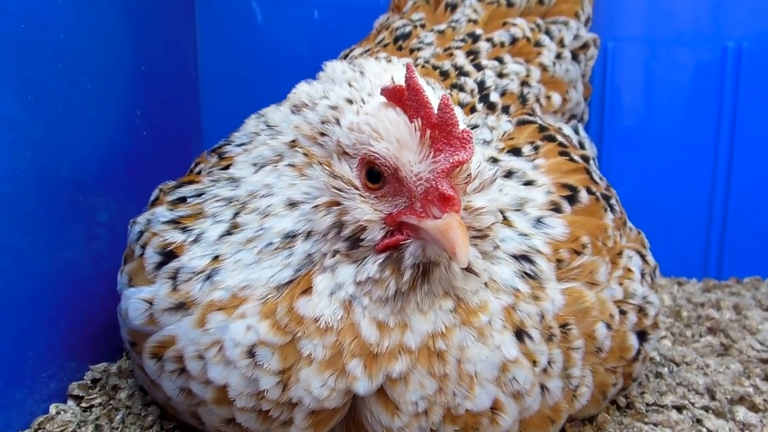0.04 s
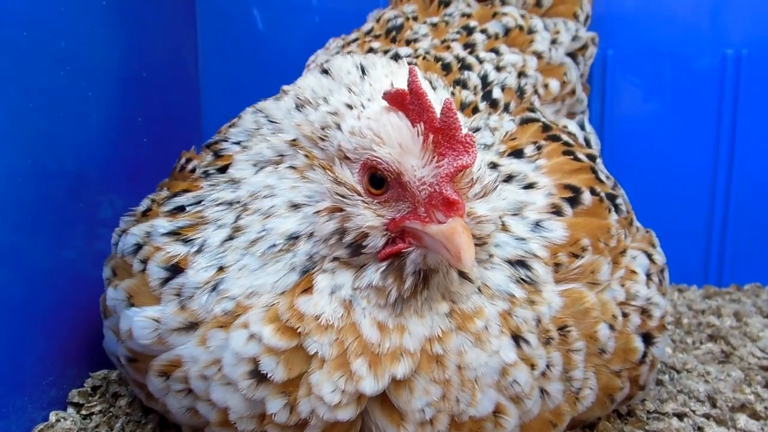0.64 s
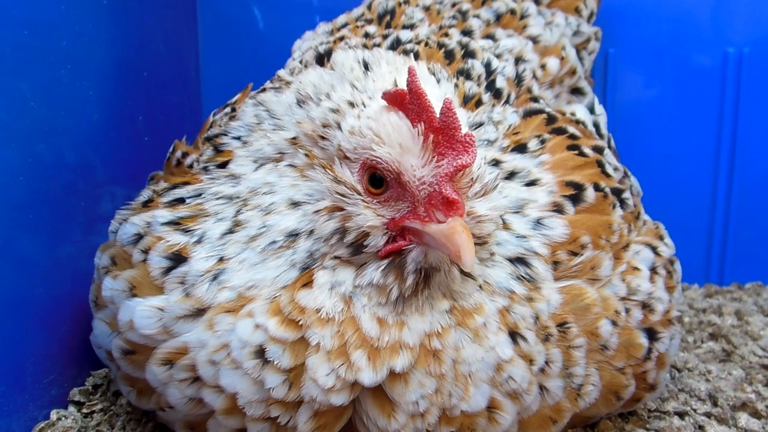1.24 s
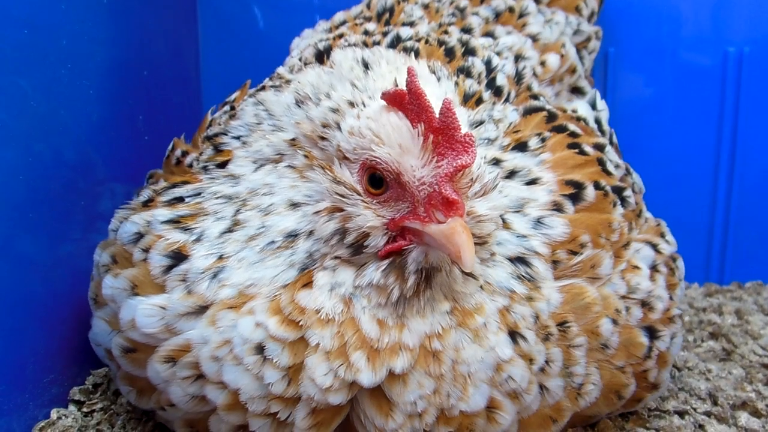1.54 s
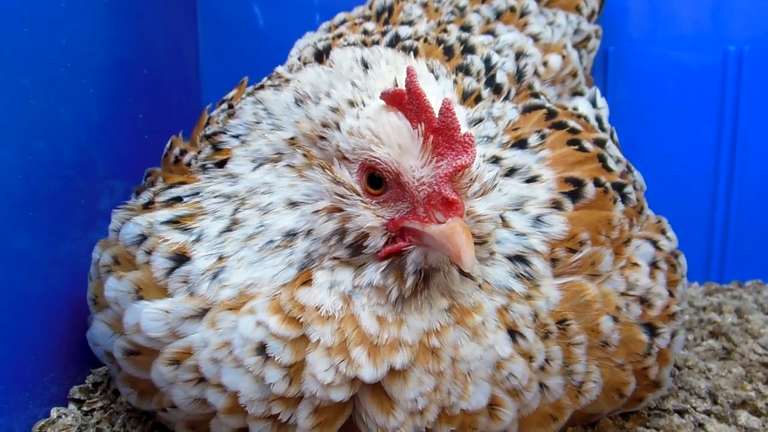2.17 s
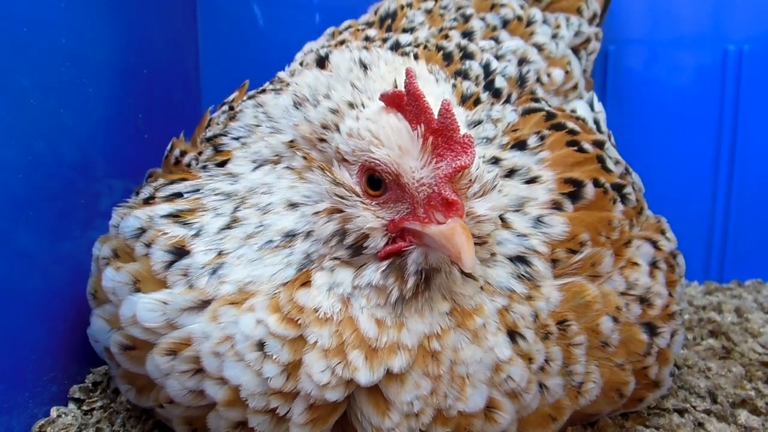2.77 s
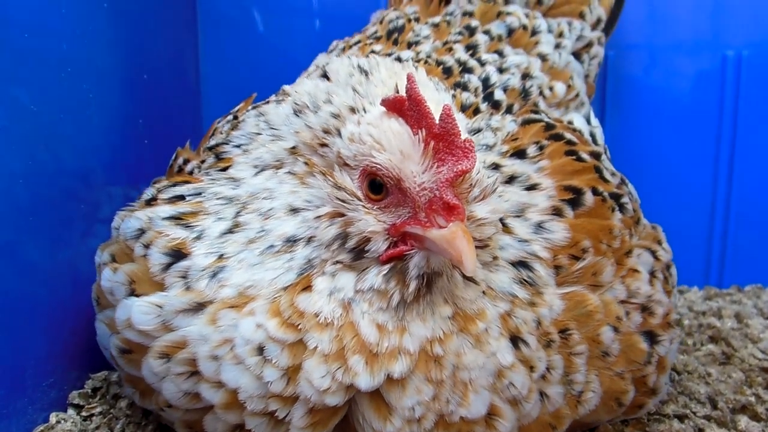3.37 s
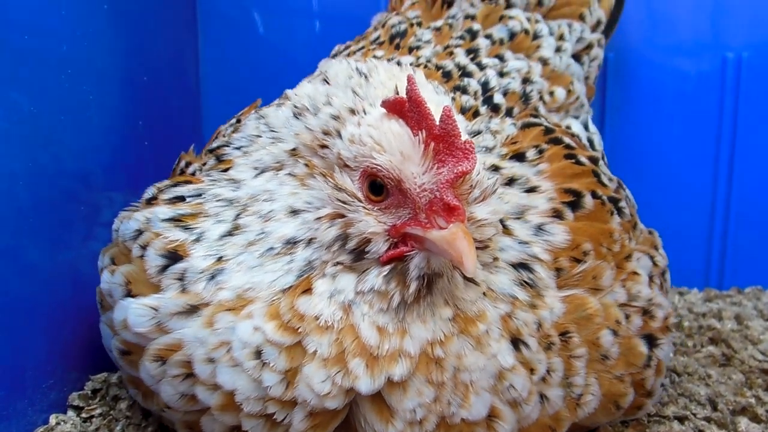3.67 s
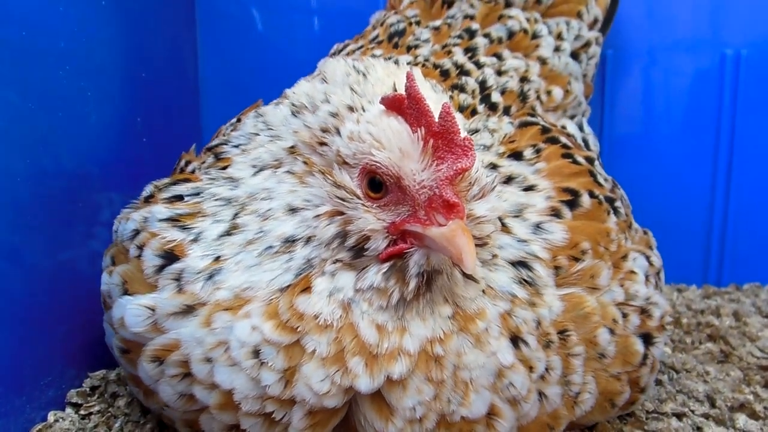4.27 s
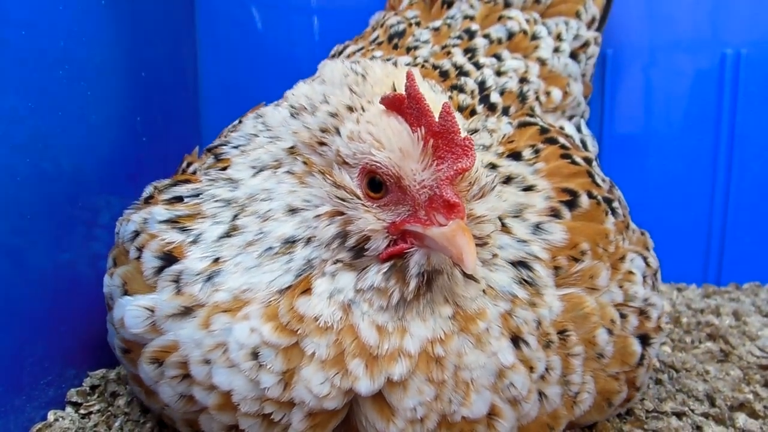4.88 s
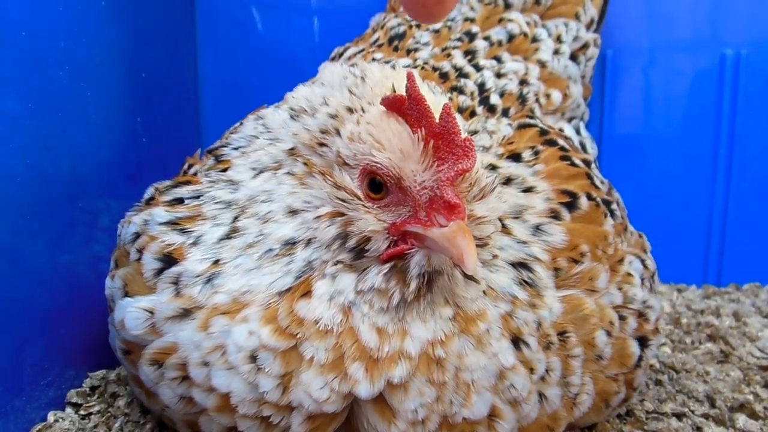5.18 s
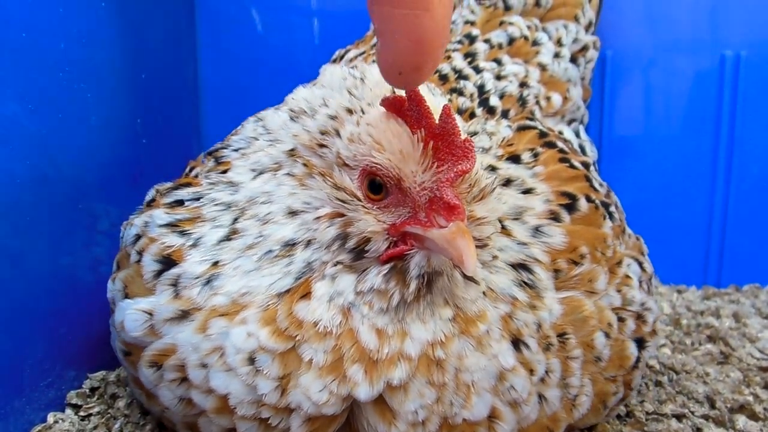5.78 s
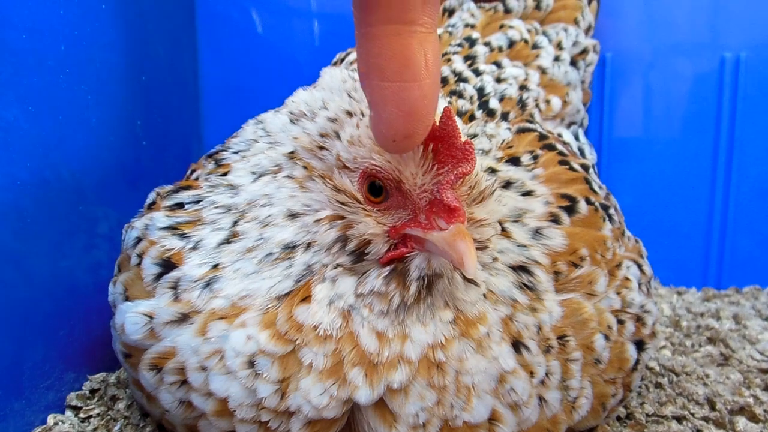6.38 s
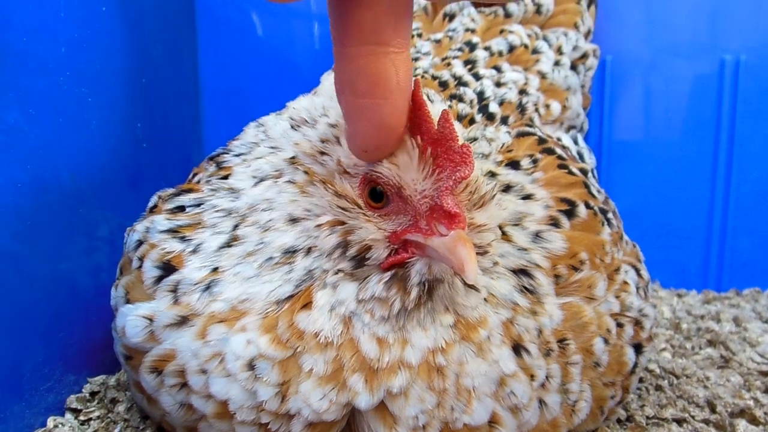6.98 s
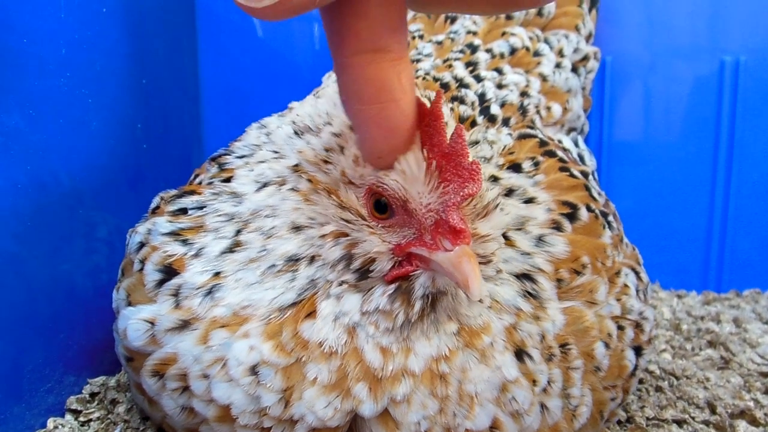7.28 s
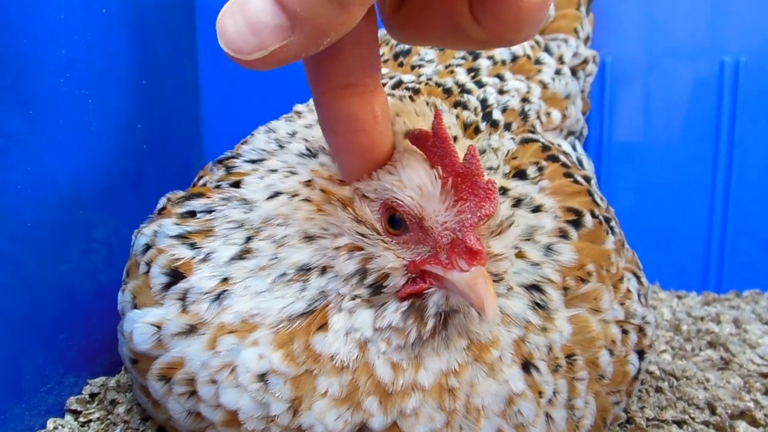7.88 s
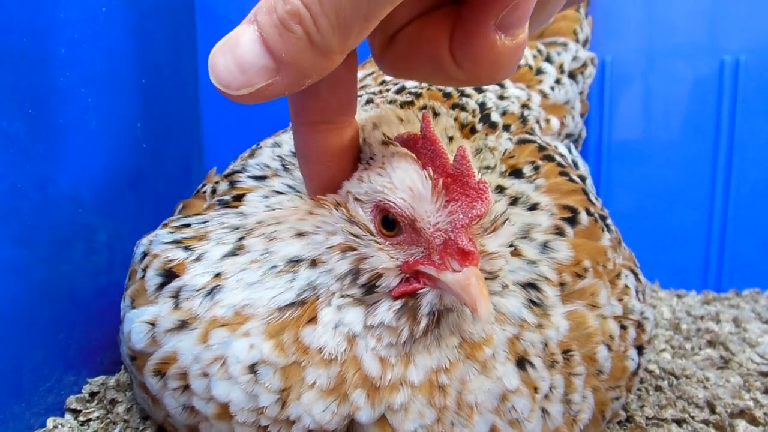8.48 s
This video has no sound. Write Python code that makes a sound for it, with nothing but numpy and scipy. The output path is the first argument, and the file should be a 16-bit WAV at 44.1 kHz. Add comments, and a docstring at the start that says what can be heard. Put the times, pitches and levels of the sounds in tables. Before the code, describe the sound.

A hen growls very close to the microphone in a plastic nest box. Her rapidly fluttering voice rises to a shriek, breaks into short croaks and sinks into a low rasp after about three seconds. The box takes two soft bumps early on, and chicks peep faintly nearby. Afterwards her feathers rustle lightly as she is stroked, while a distant engine slowly grows over a quiet outdoor rumble.

```python
"""Broody hen in a nest box

A hen growls close up in a plastic nest box: one whistling tone that swoops down about 58 times
a second, rises to a shriek, breaks into short croaks and sinks into a rasp. Chicks peep nearby,
feathers rustle as she is stroked, the box takes two soft bumps, and a far engine grows over
a quiet outdoor rumble."""
import sys
import numpy as np
from scipy import signal
from scipy.fft import rfft, irfft
from scipy.io import wavfile
from scipy.ndimage import uniform_filter1d

SR = 44100
rng = np.random.default_rng(int(sys.argv[2]) if len(sys.argv) > 2 else 0)


def digitize_waveform(pressure):
    """Quantize a signal to 16-bit integers and store it at the path in sys.argv[1].

    Rows of a 2-D input are taken as channels; values are limited to [-1, 1].
    """
    field = np.atleast_2d(pressure).T
    bounded = np.clip(field, -1, 1)
    quanta = np.round(bounded * 32767).astype(np.int16)
    wavfile.write(sys.argv[1], SR, quanta)


N = 380583
T = np.arange(N) / SR
FREQS = np.fft.rfftfreq(N, 1 / SR)
TOP_HZ = 14300

# surges and sags of strain in the shriek: centre t/s, length/s, lift/dB
STRAIN_SURGES = [(.86, 0.018, 4), (.888, 0.01593, -6), (.92, 0.021, 3), (.943, 0.02497, -4)]
SURGE_AIR = 2.05  # dB of rasp and hiss for each dB of surge


def undb(db):
    """Decibels to gain."""
    return 10 ** (np.asarray(db) / 20)


def curves(table):
    """Each column of a table, joined by straight lines in time."""
    times, *columns = np.transpose(table)
    return [np.interp(T, times, column) for column in columns]


def swells(table):
    """Bell-shaped lifts in dB."""
    return sum(db * np.exp(-(2 * (T - centre) / length) ** 2) for centre, length, db in table)


def gain_at(hz, points):
    """Gain of an EQ curve (f/Hz, level/dB) at given frequencies."""
    f, db = np.transpose(points)
    return undb(np.interp(np.log(hz + 1e-3), np.log(f), db))


def unit(x):
    """Scale to rms 1."""
    return x / np.sqrt(np.mean(x ** 2))


def noise(colour):
    """Noise of a given colour, rms 1, with no infrasound."""
    return unit(irfft(rfft(rng.standard_normal(N)) * gain_at(FREQS, colour) * (FREQS > 20), N))


def wide_noise(colour):
    """Stereo noise: centred in the bass, wide in the treble."""
    # stereo width: f/Hz, side minus mid/dB
    width = [(30, -26), (70, -22.5), (300, -15), (1000, -9.5), (2500, -3), (6000, 0), (14000, 2)]
    side = irfft(rfft(noise(colour)) * gain_at(FREQS, width), N)
    return noise(colour) + np.array([side, -side])


def walk(rate):
    """Smooth random wander, rms 1."""
    hold = max(int(SR / rate), 1)
    return unit(uniform_filter1d(np.repeat(rng.standard_normal(N // hold + 1), hold)[:N], hold))


def echoes(x, t60, size=16384):
    """A short diffuse tail of unit energy, different on each side."""
    tails = rng.standard_normal((2, size)) * np.exp(-np.log(1000) * T[:size] / t60) * (T[:size] > .003)
    tails /= np.sqrt(np.sum(tails ** 2, axis=1, keepdims=True))
    return signal.fftconvolve(x[None], tails, axes=1)[:, :N]


def outdoor_bed(air_db=-42.5):
    """Outdoor rumble and hiss, with a faint electronic whine."""
    # colour of the open air: f/Hz, level/dB
    air_colour = [(22, -2), (45, -1), (76, 2.5), (150, -13), (250, -14), (400, -18), (900, -22.5),
                  (1300, -25), (2500, -31.5), (5000, -35.5), (14000, -38.5)]
    # whine tones: f/Hz, level/dB
    whine_tones = [(12328, -72), (13194, -76)]
    whine = sum(np.sqrt(2) * undb(db) * np.sin(2 * np.pi * hz * T) for hz, db in whine_tones)
    return wide_noise(air_colour) * undb(air_db + .4 * walk(3.498)) + whine


def far_engine(firing_hz=71.4):
    """An engine draws near: a wavering firing hum, a drone above it and the wash of the road."""
    # fader for all three layers: t/s, level/dB
    approach = [(0, -78), (3, -57.5), (4.5, -52), (7.1, -46), (7.85, -43), (8.63, -44)]
    # swells of hum and drone: centre t/s, length/s, lift/dB
    hum_swells = [(5.55, 0.85, 10.5), (6.9, .7, 6), (8.33, 0.91, 13.5)]
    drone_swells = [(7.52, 0.65, 6.4)]
    # colours of drone and road: f/Hz, level/dB
    drone_colour = [(60, -52), (125, -6.5), (175, -6.5), (235, 9.5), (280, 4), (360, -11.5), (700, -69),
                    (1080, -24), (1220, -7), (1380, -70), (3000, -72)]
    road_colour = [(100, -1.5), (380, -10.5), (520, -1), (750, -9), (1000, -4), (1120, -13.5),
                   (1220, -14.5), (1400, -11.5), (2000, -20.5), (4000, -31.5), (14000, -61)]
    near_db, = curves(approach)
    phase = 2 * np.pi * np.cumsum(firing_hz * (1 + .055 * walk(16))) / SR
    hum = np.sqrt(2) * np.sin(phase) * undb(-3.5 + swells(hum_swells) + .25 * walk(6.7))
    drone = wide_noise(drone_colour) * undb(.5 + swells(drone_swells))
    road = wide_noise(road_colour) * undb(.5 + 1.4 * walk(5.9))
    return (hum + drone + road) * undb(near_db)


def touches(cues, colour, grain_db):
    """Soft swells of grainy contact noise."""
    envelope = sum(undb(db) * np.exp(-(2 * (T - centre) / length) ** 2) for centre, length, db in cues)
    return wide_noise(colour) * envelope * unit(undb(grain_db * walk(600)))


def box_bumps():
    """Soft, low bumps on the box."""
    # bumps: centre t/s, length/s, level/dB
    bumps = [(.705, 0.037, -30.5), (.78, 0.23, -41.5)]
    # dull thud of the box: f/Hz, level/dB
    thud_colour = [(25, 6), (60, -1.5), (110, -12), (180, -3.5), (280, -19), (600, -26), (2000, -75)]
    return touches(bumps, thud_colour, grain_db=1)


def feathers():
    """Feathers rustle as the hen is stroked."""
    # strokes: centre t/s, length/s, level/dB
    strokes = [(3.29, .05, -58), (3.64, .06, -55), (5.78, .22, -56), (7.13, 0.14, -60), (7.33, 0.058, -57),
               (7.45, 0.11, -58), (7.70, 0.046, -53), (7.9, 0.044, -58), (8.17, 0.29, -60),
               (8.53, 0.37, -55)]
    # bright rustle: f/Hz, level/dB
    rustle_colour = [(1000, -10), (3000, 0.5), (7000, -2), (11000, 0), (14000, -4)]
    return touches(strokes, rustle_colour, grain_db=2.5)


def chicks(quaver=.0181, wet=.7):
    """Thin, quavering whistles that scoop up and fall, heard through the coop's reflections."""
    # peeps: start t/s, length/s, top f/Hz, end f/Hz, relative level/dB
    peeps = [(1.216, 0.048, 3965, 3100, -34.5), (1.497, 0.12, 5830, 3000, -43),
             (1.494, 0.099, 4730, 3000, -38.5), (2.77, 0.15, 4418, 3200, -40),
             (2.977, 0.16, 6330, 3500, -45.5), (3.021, 0.1, 5380, 3100, -42.5),
             (4.005, .125, 4750, 2900, -49), (8.272, .14, 6570, 3800, -48),
             (8.33, 0.086, 5200, 3700, -45.5), (8.47, 0.13, 6420, 3400, -39.5),
             (8.494, 0.12, 5700, 3200, -51)]
    whistles = np.zeros(N)
    waver = 1 + quaver * walk(250)
    for start, length, top_hz, end_hz, db in peeps:
        on = (T > start) & (T < start + length)
        progress = (T[on] - start) / length
        fall_hz = top_hz - (top_hz - end_hz) * ((progress - .17) / .8) ** 2
        scoop = 1 - .09024 * np.exp(-progress / .0737)
        phase = 2 * np.pi * np.cumsum(fall_hz * waver[on] * scoop) / SR
        envelope = np.sqrt(2 * np.minimum(2 * np.sin(np.pi * progress), 1))
        whistles[on] += undb(db) * envelope * np.sin(phase)
    whistles *= 1 + .55 * np.tanh(walk(130))  # the level flickers
    return .56 * ((1 - wet) * whistles + wet * echoes(whistles, t60=.12))


def nest_box(x, ring_hz=1550, ring_width_hz=25, ring_db=-12, wet_db=-31):
    """Close walls colour each side; standing waves turn the phase on the right; the box rings briefly."""
    # standing waves between the walls: f/Hz, width/Hz
    standing_waves = [(1470, 164), (5150, 820)]
    # the walls favour one side: f/Hz, left minus right/dB
    balance = [(1000, -0.5), (1380, 0), (1510, 6.5), (1620, -3), (1760, -4), (2000, -7), (2750, -3),
               (3150, -9.5), (3700, -1), (4500, 3.5), (4750, -11), (5100, 17), (7000, -3.5), (11000, -4.5)]
    right = 1
    for hz, width in standing_waves:
        pole = hz ** 2 - FREQS ** 2 + 1j * FREQS * width
        right = right * (1 - (1 - pole.conj() / pole) * np.minimum(FREQS / hz, 1) ** 4)
    ring = 1j * FREQS * ring_width_hz / (ring_hz ** 2 - FREQS ** 2 + 1j * FREQS * ring_width_hz)
    left = gain_at(FREQS, balance)
    pan = np.array([left, right]) * np.sqrt(2 / (1 + left ** 2))
    return irfft(rfft(x) * (pan + undb(ring_db) * ring), N) + undb(wet_db) * echoes(x, t60=.31)


def beak_hiss(centre_s=.94, length_s=1):
    """Air hisses through the beak at the height of the shriek, flickering and flaring with the surges."""
    # colour of the hiss: f/Hz, level/dB
    hiss_colour = [(2000, -22), (4500, 3), (6000, -6), (7200, -1), (9000, -8), (10100, 3), (11500, -5),
                   (14000, -10)]
    db = -50 + SURGE_AIR * swells(STRAIN_SURGES) + 2 * walk(110)
    return noise(hiss_colour) * undb(db) * np.exp(-(2 * (T - centre_s) / length_s) ** 2)


def rasp(crest_hz, turns, arch, phase, dull_below_hz=1120, treble_cut_db=-9.5):
    """Air that rasps once a cycle, strongest as the pitch snaps back up and duller on low notes."""
    # colour of the rasp: f/Hz, level/dB
    rasp_colour = [(150, -22), (450, -62), (850, 7), (1700, 11), (2100, 0), (2500, -6), (3050, -0.5),
                   (3900, -11), (4700, -0.5), (5800, -19.5), (10000, -16.5), (14000, -25)]
    air = noise(rasp_colour)
    treble = signal.sosfiltfilt(signal.butter(2, 4000, "high", fs=SR, output="sos"), air)
    air = air + treble * (undb(treble_cut_db / (1 + (crest_hz / dull_below_hz) ** 4)) - 1)
    snap_db = 1.6 * np.sin(2 * np.pi * turns) + 3.5 * arch + 4 * np.tanh(walk(150))
    return air * undb(snap_db) * (1 + .16 * np.cos(phase))


def croaks(flutter_hz=58.1, attack_s=.005, release_s=.008, slide_s=.0135, crack_s=.0047, crack_db=.5):
    """Each croak opens with a downward slide and, if it lasts, cracks at the bottom and flutters on."""
    # croaks: start t/s, end t/s, relative level/dB, lift of the opening/dB
    cues = [(0.234, 0.261, -1, -21), (0.306, 0.314, -5.5, 6), (0.318, 0.328, 7.5, -3.5),
            (0.337, 0.342, -2, 12), (.351, 1.224, 1, -5), (1.226, 1.346, -2.5, -4),
            (1.347, 1.396, -3, -3.5), (1.422, 1.451, -0.5, -0.5), (1.479, 1.505, 1.5, -6.5),
            (1.534, 1.573, -0.5, -7.5), (1.599, 1.629, 0, -3), (1.652, 1.693, -0.5, -8),
            (1.704, 1.715, -3, 1), (1.72, 1.751, -3, 3.5), (1.749, 1.761, -1, -8), (1.77, 1.8, 3, -2),
            (1.826, 1.866, 0.5, 2), (1.876, 1.922, 1, -5.5), (1.929, 2.678, 0, 0.5),
            (2.689, 2.732, 2.5, -4), (2.747, 2.854, 2.5, -4), (2.858, 2.87, -6.5, 2), (2.879, 2.912, 0, -2)]
    rate = flutter_hz * (1 + .14 * walk(45))
    gain, turns, opening, crack = np.zeros((4, N))  # turns counts swoops, whole at each dip
    for start, end, db, opening_db in cues:
        on = (T > start - attack_s / 2) & (T < end + release_s / 2)
        age = T[on] - start
        after = age - slide_s
        # the slide runs from a crest to the first dip, where the flutter takes over
        first_dip = np.ceil(turns.max()) + 1
        slide = .5 * np.minimum(after / slide_s, 0)
        turns[on] = first_dip + slide + np.cumsum(rate[on] * (after > 0)) / SR
        opening[on] = np.clip(-after / attack_s, 0, 1)
        crack[on] = np.exp(-((after - crack_s / 2) / crack_s) ** 2)
        gate = np.clip(np.minimum(age / attack_s, (end - T[on]) / release_s) + .5, 0, 1)
        gain[on] = gate * undb(db + opening_db * opening[on] + crack_db * crack[on])
    return gain, turns, opening, crack


def swoops(crest_hz, tight, hoarse_db, turns, opening, crack):
    """Pitch and level flutter: a tight syrinx lingers on top and dips sharply; a slack one swings evenly."""
    def morph(slack, taut):
        return slack + (taut - slack) * tight

    # depth as a share of the pitch: low notes swing less, a hoarse shriek dips further
    depth = morph(.365, .17) + .07 * np.log2(crest_hz / 1500)
    depth += .07 * tight * np.minimum(undb(hoarse_db + 26), 1)
    # 0 in a dip, 1 on a crest: each swoop snaps up quickly and slides down more slowly
    arch = np.abs(np.sin(np.pi * (turns % 1) ** .85)) ** morph(1.35, .9)
    # no two swoops are alike: the higher ones are also louder
    chance = np.clip(rng.standard_normal((N // 100, 2)), -1.4, 1.4)
    dip_lift = chance[np.round(turns).astype(int), 0] * (1 - crack)
    crest_lift = chance[turns.astype(int), 1]
    top_hz = crest_hz * (1 + morph(.04005, .01187) * crest_lift) * (1 - .06 * opening)
    trough_hz = crest_hz * (1 - depth - .08 * crack + .05 * dip_lift)
    lurch = morph(.0364, 0) * np.tanh(walk(28.05))
    jitter = morph(.01967, .0013)
    hz = (top_hz * arch + trough_hz * (1 - arch)) * (1 + jitter * walk(1100) + lurch)
    top_db = morph(1.3, .6) * crest_lift
    trough_db = morph(1.5, -4) + 2 * tight * dip_lift
    shimmer_db = 55 * jitter * np.tanh(walk(350))
    return hz, top_db * arch + trough_db * (1 - arch) + shimmer_db, arch


def throat_tone(hz, phase, crest_hz, tight, arch, opening):
    """The whistle of the syrinx and its overtones, coloured by the throat."""
    # throat EQ for the fundamental and for the overtones: f/Hz, level/dB
    fundamental_eq = [(500, -4), (660, -3), (880, 2.5), (1100, -0.5), (1400, -2), (1750, -1)]
    overtone_eq = [(1300, -3.5), (1700, -4.5), (2100, -27.5), (2500, -27), (3050, -18), (3500, -26.5),
                   (3950, -31.5), (4700, -20.5), (5200, -29), (5800, -73), (7100, -44.5), (9000, -53),
                   (10300, -45.5), (14000, -59)]
    fundamental = gain_at(hz, fundamental_eq) * np.sin(phase)
    # the higher the note, the sharper its pulses and the stronger the top overtones
    edge = 4.8 * (hz / 1500 - 1)
    overtones = sum((k / 2) ** edge * gain_at(k * hz, overtone_eq) * (k * hz < TOP_HZ) * np.sin(k * phase)
                    for k in range(2, 10))
    overtone_db = 3.5 + 8 * np.log2(crest_hz / 1500) + 2.7 * walk(120)
    overtone_db -= 8 * (1 - arch) + 10 * opening  # dips and opening slide lack pressure and are duller
    slack_octave = undb(-23.5) * (1 - tight) * (1 - opening) * np.cos(2 * phase)
    return np.sqrt(2) * (fundamental + slack_octave + undb(overtone_db) * overtones)


def hen(shriek_hz=1617, blend_hz=44.96):
    """A fluttering, hoarse growl that tightens into a shriek as its pitch climbs."""
    # tension and effort of the voice: t/s, crest f/Hz, level/dB
    growl = [(0.25, 1238, -15.5), (0.33, 1310, -27), (0.425, 1720, -20), (0.65, 1740, -21),
             (0.86, 1827, -18.5), (1.21, 1650, -20), (1.36, 1466, -18.5), (1.43, 1197, -18.5),
             (1.49, 1001, -18.5), (1.56, 975, -15), (1.62, 1420, -17.5), (1.88, 1489, -20),
             (2.06, 1582, -18), (2.36, 1576, -15.5), (2.5, 1465, -15.5), (2.585, 1201, -16.5),
             (2.66, 1097, -15.5), (2.77, 859.7, -20), (2.9, 838, -16.5)]
    # hoarseness, the shriek starting clean and turning rough: t/s, relative level/dB
    hoarseness = [(.25, -18.5), (.32, -17), (.375, -12), (.42, -58.5), (.72, -52.5), (.83, -28),
                  (1.2, -26.5), (1.5, -21.5), (2.1, -22.5), (2.9, -15.5)]
    crest_hz, effort_db = curves(growl)
    hoarse_db, = curves(hoarseness)
    surge_db = swells(STRAIN_SURGES)
    tight = .5 + .5 * np.tanh((crest_hz - shriek_hz) / blend_hz)  # 0 slack growl, 1 shriek
    gain, turns, opening, crack = croaks()
    hz, swoop_db, arch = swoops(crest_hz, tight, hoarse_db, turns, opening, crack)
    hz = hz * (1 + .00823 * surge_db)  # strain bends the pitch
    phase = 2 * np.pi * np.cumsum(hz) / SR
    tone = throat_tone(hz, phase, crest_hz, tight, arch, opening)
    rasp_db = hoarse_db + SURGE_AIR * surge_db + 3 * crack - 7.3 * opening
    air = rasp(crest_hz, turns, arch, phase) * undb(rasp_db)
    # on rough crests every other cycle differs, adding tones at 1/2 and 3/2 of the pitch
    grit = (np.sin(phase / 2) + .85 * np.sin(3 * phase / 2)) * walk(120)
    grit *= arch ** 2 * (1 - opening) * undb(hoarse_db + np.interp(tight, (0, 1), (-2, 4)))
    return (tone + air + grit) * undb(effort_db + surge_db + swoop_db) * gain


def scene():
    """The hen in her box and everything around it."""
    contact = feathers() + box_bumps()
    return nest_box(hen() + beak_hiss()) + chicks() + contact + far_engine() + outdoor_bed()


def record(dry):
    """A steep low-pass cuts the top."""
    return signal.sosfilt(signal.ellip(10, .2, 70, TOP_HZ, fs=SR, output="sos"), dry)


dry = scene()
out = record(dry)
digitize_waveform(out)
```